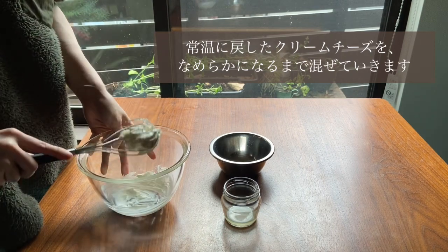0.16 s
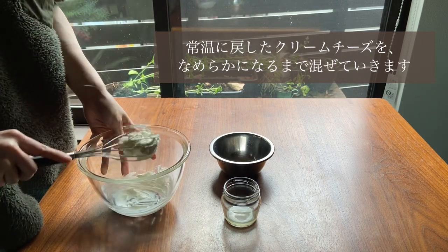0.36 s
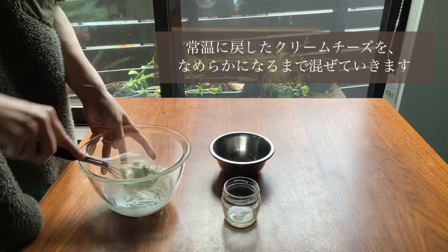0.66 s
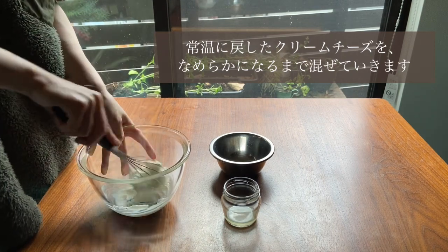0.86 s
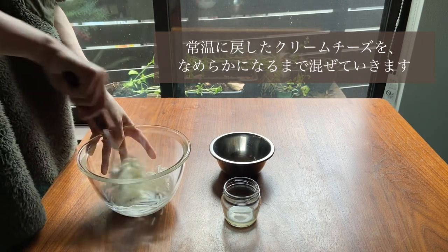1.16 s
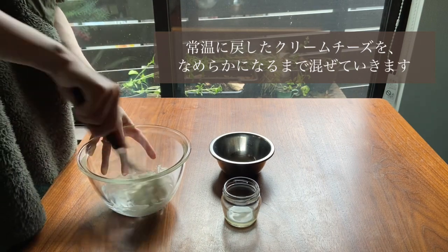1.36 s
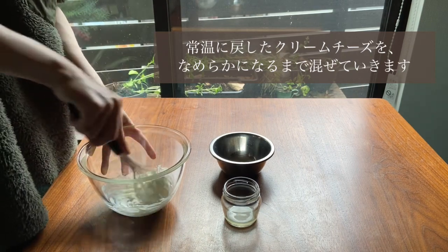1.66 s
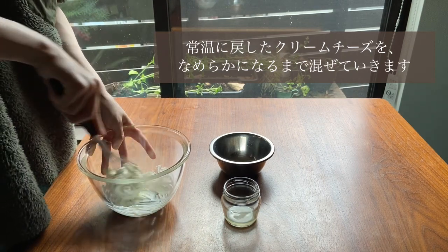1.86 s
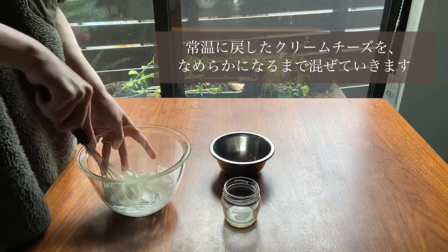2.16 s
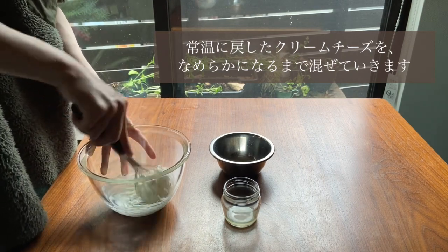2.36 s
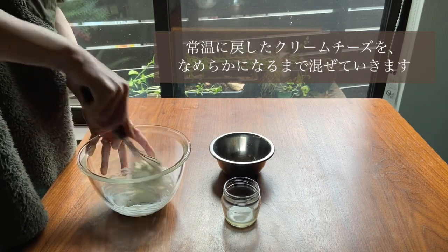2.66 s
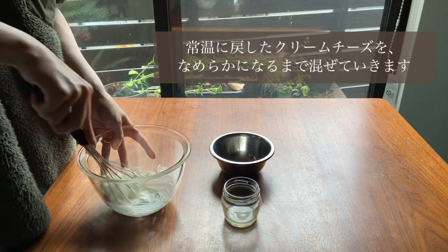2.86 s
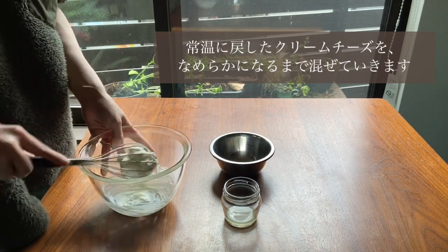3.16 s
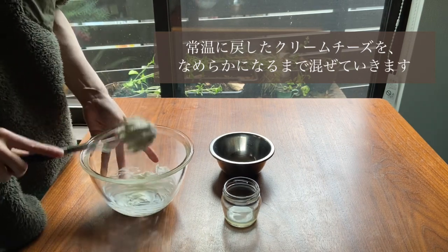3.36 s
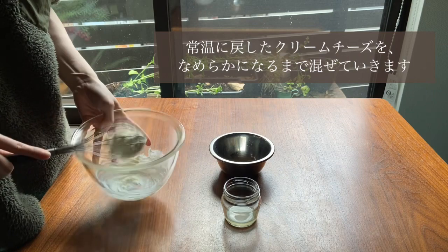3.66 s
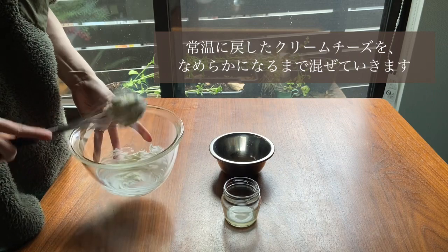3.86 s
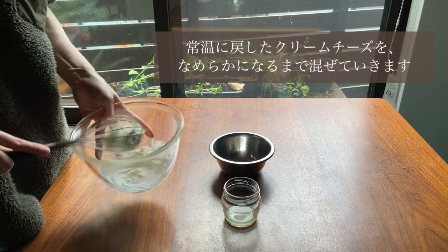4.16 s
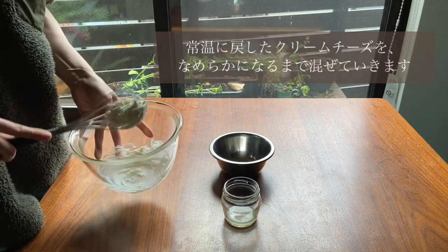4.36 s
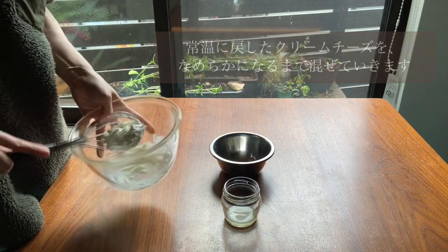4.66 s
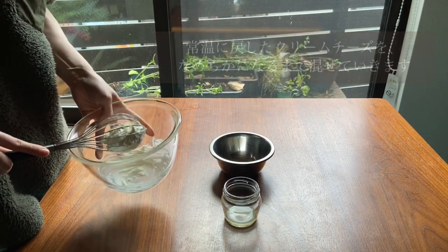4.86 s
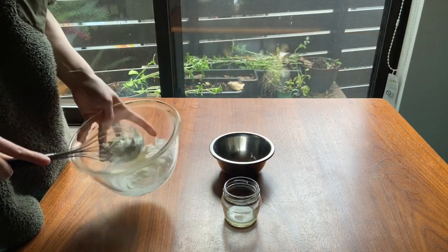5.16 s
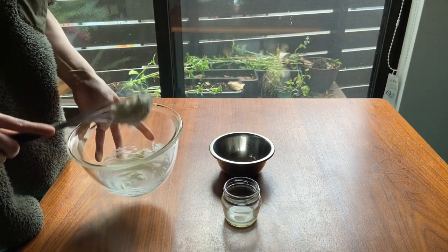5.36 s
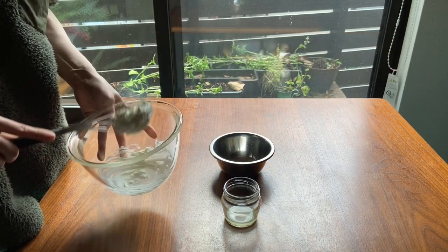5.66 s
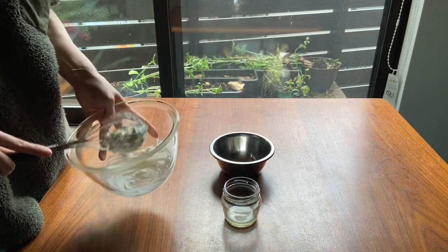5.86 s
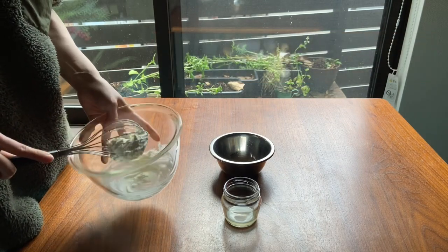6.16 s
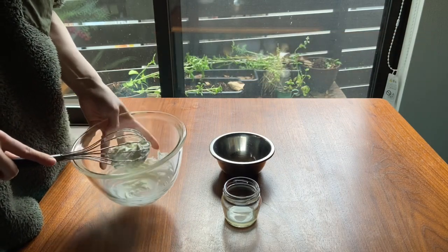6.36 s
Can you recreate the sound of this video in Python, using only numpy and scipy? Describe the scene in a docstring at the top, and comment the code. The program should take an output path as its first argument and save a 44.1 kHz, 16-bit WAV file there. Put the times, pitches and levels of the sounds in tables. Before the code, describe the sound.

In a quiet small kitchen, a wire whisk taps a standing glass bowl three times, each clink backed by a woody table thud. Quick soft stirring strokes follow, with sticky cheese pops and muffled wire chinks. The grip shifts, the bowl is lifted, and the whisk knocks its rim in bright, bouncing clinks while a low wavering hum grows and stops. Close stereo microphones, short room echo.

```python
"""A wire whisk clinks on a glass bowl of soft cheese in a small kitchen: ringing tones plus a noisy clash.
It taps the standing bowl three times, stirs, then knocks the rim of the lifted bowl, often bouncing.
Stirring is made of random tiny slips, the cheese's pops of short noise bursts, the table of thuds and knocks.
A low hum, a wavering tone with a dull rush, swells and stops; quiet air noise lies below.
A close pair of microphones hears it all."""
import sys
import numpy as np
from scipy import signal
from scipy.fft import rfft, irfft
from scipy.io import wavfile

SR = 44100
rng = np.random.default_rng(int(sys.argv[2]) if len(sys.argv) > 2 else 0)


def wrap_up_sound(samples):
    """Save the sound to the file named by the first command line argument, as 16-bit audio."""
    columns = np.atleast_2d(samples).T
    # keep every value between -1 and 1, then stretch to whole-number steps
    tamed = np.clip(columns, -1, 1)
    steps = np.round(tamed * 32767).astype(np.int16)
    wavfile.write(sys.argv[1], SR, steps)


N = 287532  # length in samples
T = np.arange(N) / SR  # time in the scene, s
AGE = T[:int(.42 * SR)]  # time since a blow, s


def undb(db):
    """Turn decibels into a plain multiplier."""
    return 10 ** (np.asarray(db) / 20)


def unit(x):
    """Scale to an average (rms) strength of 1."""
    return x / np.sqrt(np.mean(x ** 2) + 1e-24)


def colour(x, spectrum):
    """Filter by (Hz, dB) points joined by lines on a log-frequency axis."""
    hz, db = np.transpose(spectrum)
    f = np.maximum(np.fft.rfftfreq(x.shape[-1], 1 / SR), 1)
    gain = undb(np.interp(np.log(f), np.log(hz), db))
    return irfft(rfft(x) * gain, x.shape[-1])


def noise(spectrum, size=N):
    """Coloured noise with an rms of 1."""
    return unit(colour(rng.standard_normal(size), spectrum))


def fade(t60, rise):
    """Loudness shape of a blow: quick rise, then a decay of 60 dB in t60 seconds."""
    return (1 - np.exp(-(AGE / rise) ** 2)) * np.exp(-np.log(1000) * AGE / t60)


def swell(start, length, attack, t60):
    """Loudness shape of a movement: it rises, holds, then dies away by 60 dB in t60 seconds."""
    rise = np.clip((T - start) / attack, 0, 1)
    return rise * np.exp(-np.log(1000) * np.maximum(T - start - length, 0) / t60)


def walk(rate):
    """Slow random wandering: rate random points a second, joined by lines."""
    knots = rng.standard_normal(int(N / SR * rate) + 2)
    return np.interp(T * rate, np.arange(len(knots)), knots)


def add(track, s, sound):
    """Mix a sound in at time s."""
    i = max(int(s * SR), 0)
    track[i:i + len(sound)] += sound[:max(N - i, 0)]


def ring(modes, rise, scatter_db, hold=1, detune=0):
    """A struck object sings several fading tones, shared out a little differently each time.

    A hold under 1 damps them, as a touch would."""
    out = np.zeros(len(AGE))
    for hz, db, t60 in modes:
        level, turns, shift = rng.standard_normal(3)
        tone = np.sin(2 * np.pi * (hz * (1 + detune * shift) * AGE + turns))
        out += undb(db + scatter_db * level) * fade(t60 * hold, rise) * tone
    return out


def jangle(modes, rise, hold, count=3):
    """Several wire loops, no two quite alike, beat against each other."""
    loops = sum(ring(modes, rise, scatter_db=1, hold=hold, detune=.007) for _ in range(count))
    return loops / np.sqrt(count)


def crackle(rate, spread):
    """Tiny slips at random moments, about rate a second, most weak and a few strong."""
    sizes = undb(spread * np.minimum(rng.exponential(size=N), 5))
    return unit((rng.random(N) < rate / SR) * sizes * rng.standard_normal(N))


def kitchen(x, t60, wet_db, side_db):
    """Direct sound and a short room echo, whose left and right differ most in the middle range."""
    tail = rng.standard_normal((2, len(AGE))) * fade(t60, 0.0066)
    tail /= np.sqrt(np.sum(tail ** 2, axis=1, keepdims=True))
    mid, side = (signal.fftconvolve(x, h)[:N] for h in tail)
    side = colour(side, [(50, -3.5), (300, 5.5), (1100, 1.5), (2300, -10.5), (4500, -1.5), (9000, -20)])
    return x + undb(wet_db) * mid + undb(side_db) * side * np.array([[1], [-1]])


# tone colour of the quiet air: (frequency [Hz], relative level [dB])
AIR_COLOUR = [(15, -51), (25, -17.5), (50, -1.5), (87, 4.5), (236, -11), (427, -4.5), (531, -8.5),
              (1740, -21), (6920, -23.5), (8830, -46), (11900, -32), (16000, -40.5)]


def quiet_air():
    """Soft steady noise, much alike left and right in the bass."""
    difference = colour(noise(AIR_COLOUR), [(60, -14.5), (1000, -2.0)])
    return undb(-79) * (noise(AIR_COLOUR) + difference * np.array([[1], [-1]]))


# tone colour of the dull rush with the hum: (frequency [Hz], relative level [dB])
RUSH_COLOUR = [(30, -19), (65, 9.5), (130, 10), (250, 4), (400, -4), (800, -10), (1500, -20), (3000, -33),
               (8000, -42.5)]
HUM_START_S, HUM_LENGTH_S, HUM_ATTACK_S = 2.9, 2.2, 0.17
HUM_HZ, HUM_RISE_HZ_PER_S, HUM_LIFT_HZ, HUM_LIFT_S = 123.4, 1.3, 16, 0.07


def hum():
    """A wavering low tone and its octave swell in a dull rush, lift in pitch and stop."""
    running = np.clip(T - HUM_START_S, 0, HUM_LENGTH_S)
    lift = HUM_LIFT_HZ * np.exp((running - HUM_LENGTH_S) / HUM_LIFT_S)
    hz = HUM_HZ + HUM_RISE_HZ_PER_S * running + lift
    phase = 2 * np.pi * np.cumsum(hz * (1 + .014 * walk(9))) / SR
    waver = undb(2.2 * walk(14))
    tone = unit(np.sin(phase) + undb(-17) * np.sin(2 * phase)) * waver
    tone = tone * swell(HUM_START_S, HUM_LENGTH_S, HUM_ATTACK_S, t60=.4)
    rush = undb(-6) * noise(RUSH_COLOUR) * swell(HUM_START_S, HUM_LENGTH_S, HUM_ATTACK_S, t60=.6)
    return undb(-67 + 4.5 * running) * (tone + rush)  # grows 4.5 dB a second


# taps on the standing bowl, also played by taps(): (time [s], strength [dB], time of rocking back [s])
STANDING_TAPS = [(0.023, -39.5, 0.078), (0.26, -40.5, 0.31), (0.479, -40, 0.527)]
# ringing tones of the table top: (frequency [Hz], relative level [dB], time to fade 60 dB [s])
TABLE_TONES = [(135, -8, 0.2), (166.6, -0.5, 0.16), (194.4, -3, 0.11), (278.3, -22, 0.14)]
# tone colour of a knock on wood: (frequency [Hz], relative level [dB])
KNOCK_COLOUR = [(100, -10), (220, 7), (290, 12.5), (360, -12), (420, 8.5), (560, -4.5), (800, 2.5),
                (1050, -8), (1280, -11), (1700, -26.5), (3000, -31), (6000, -68.5), (14000, -39.5)]
# tone colour of a deep boom: (frequency [Hz], relative level [dB])
BOOM_COLOUR = [(25, -33), (42, -11), (58, 9), (95, 3.5), (140, -1.5), (300, -5), (600, -60.5)]
# the table's (thud [dB], knock [dB]) relative to the tap: as it lands, and as the bowl rocks back
PRESS_DB = (13, 3)
ROCK_DB = (5, 8)


def thumps():
    """The bowl's foot knocks on the wood; the table top thuds, and its frame booms a little later."""
    out = np.zeros(N)
    for tap_s, db, rock_s in STANDING_TAPS:
        for s, (thud_db, knock_db) in ((tap_s, PRESS_DB), (rock_s, ROCK_DB)):
            top = ring(TABLE_TONES, rise=0.0092, scatter_db=0.5)
            knock = noise(KNOCK_COLOUR, size=len(AGE)) * fade(0.15, 0.0004)
            frame = undb(-0.5) * noise(BOOM_COLOUR, size=len(AGE)) * fade(0.34, 0.046)
            add(out, s, undb(db + thud_db) * top + undb(db + knock_db) * (knock + frame))
    return out


# tone colour of wires or skin scraping: (frequency [Hz], relative level [dB])
SCRAPE_COLOUR = [(500, -9.5), (1100, -3.5), (1700, 7.5), (2500, 0), (4200, 3.5), (5200, -0.5), (6300, 3.5),
                 (7400, -1.5), (8400, 2.5), (10500, -13.5), (16000, -29)]
# tone colour of the hollow bowl: (frequency [Hz], relative level [dB])
HOLLOW_COLOUR = [(120, -42), (300, -13), (520, 2.5), (620, -4), (720, 4), (840, -1), (1050, -12.5),
                 (2000, -25.5), (6000, -43)]
# tone colour of the treble fizz: (frequency [Hz], relative level [dB])
FIZZ_COLOUR = [(6000, -51.5), (9000, -12), (11500, 3), (12700, 2.5), (14200, -2.5), (15300, 4),
               (16200, -18)]
# tone colour of a push on the table: (frequency [Hz], relative level [dB])
PUSH_COLOUR = [(35, -3.5), (75, 6.5), (175, 5.5), (240, 2), (310, 2.5), (400, -13), (700, -31)]
# shifts of the grip: (time [s], length [s], swish level [dB], treble fizz level [dB], bump level [dB])
GRIP_SHIFTS = [(2.999, 0.043, -72.5, -68.5, -58), (3.211, 0.014, -67, -77, -63),
               (5.005, .04, -65, -69.5, -71)]


def grips():
    """Skin slides on the handle with a smooth swish and nudges the bowl against the table."""
    swish = noise(SCRAPE_COLOUR) + undb(1) * noise(HOLLOW_COLOUR)
    fizz = noise(FIZZ_COLOUR)
    out = np.zeros(N)
    for s, length, db, fizz_db, bump_db in GRIP_SHIFTS:
        slide = undb(db) * swish + undb(fizz_db) * fizz
        out += swell(s, length, attack=0.026, t60=0.33) * slide
        knock = noise(KNOCK_COLOUR, size=len(AGE)) * fade(0.15, 0.0034)
        push = undb(3.5) * noise(PUSH_COLOUR, size=len(AGE)) * fade(0.4, 0.013)
        add(out, s, undb(bump_db) * (knock + push))
    return out


# ringing tones of the whisk's loops: (frequency [Hz], relative level [dB], undamped time to fade 60 dB [s])
WHISK_TONES = [(1667, -21.5, 0.061), (4100, -13.5, 0.45), (4252, -1, 0.19), (6523, -1, 0.021),
               (8270, -3, .13), (8660, 5, 0.057), (10850, -3, 0.14), (11240, -3.5, 0.081),
               (12005, -4.5, 0.13), (13130, -6, 0.15), (13300, -5.5, .08), (14400, -7.5, .07),
               (14900, 1.5, 0.072), (15550, -9, 0.044)]
# wires touching the wall through the cheese: (time [s], level [dB])
WALL_BRUSHES = [(1.0715, -53), (1.1348, -50.5), (1.264, -58.5), (1.4616, -57), (1.4835, -58), (2.1894, -82),
                (2.5561, -49), (2.585, -53), (2.6708, -58), (2.7516, -61), (2.794, -57)]


def brushes():
    """A coated wire catches the wall: damped loops and a burst of noise make a muffled chink."""
    out = np.zeros(N)
    for s, db in WALL_BRUSHES:
        loops = undb(-3) * jangle(WHISK_TONES, rise=0.00033, hold=0.55)
        wires = undb(-3.5) * noise(SCRAPE_COLOUR, size=len(AGE)) * fade(0.045, 0.00029)
        add(out, s, undb(db) * (loops + wires))
    return out


# tone colour of a snapping pocket before its tilt: (frequency [Hz], relative level [dB])
SNAP_COLOUR = [(700, -45), (2000, 3.5), (6000, 2.5), (12000, -4.5), (16000, -15)]
# sticky pops of the cheese: (time [s], level [dB], tilt towards the treble [dB per octave])
CHEESE_POPS = [(0.9147, -70, 18), (0.9418, -57, 6), (1.2219, -36, 2), (1.2513, -55, 8), (1.5422, -48.5, 2),
               (1.6114, -48, 2), (1.877, -36.5, 2), (1.9031, -34, -3), (1.9072, -38, -2.5),
               (1.9926, -50.5, -10), (2.3404, -53.5, 3), (2.586, -42, -3), (2.6442, -42, -4)]


def pops():
    """Air pockets in the cheese snap open, a very short burst, and echo briefly inside the bowl."""
    out = np.zeros(N)
    for s, db, tilt in CHEESE_POPS:
        tone = [(hz, db + snap_db + tilt * np.log2(hz / 5000)) for hz, snap_db in SNAP_COLOUR]
        snap = undb(18.5) * fade(0.0016, 0.00031)
        echo = undb(-14.5) * fade(0.11, 0.0021)
        add(out, s, colour(rng.standard_normal(len(AGE)), tone) * (snap + echo))
    return out


# strokes: (time [s], length [s], scrape level [dB], push on table level [dB], hollow rub level [dB])
STIR_STROKES = [(0.918, 0.035, -91, -66, -86), (1.056, 0.092, -68.5, -59, -64),
                (1.253, 0.13, -66, -69.5, -77), (1.434, 0.065, -62.5, -55.5, -59),
                (1.611, 0.1, -77, -68, -79.5), (1.769, 0.14, -68, -64.5, -72.5),
                (1.944, 0.19, -81.5, -79.5, -87), (2.16, 0.045, -66.5, -59, -74.5),
                (2.295, 0.067, -68, -65.5, -78.5), (2.394, 0.16, -67, -68, -72),
                (2.541, 0.082, -68, -56, -68.5), (2.658, 0.15, -66.5, -68.5, -72.5)]
STROKE_ATTACK_S, CLING_DB = 0.034, 3  # cling: how much the scrape's colour varies from stroke to stroke


def stirring():
    """Wires slip through the cheese and set damped loops singing; bowl and table rumble under the push."""
    slips = crackle(rate=1600, spread=2.2) * undb(3 * walk(69))
    loops = signal.fftconvolve(slips, jangle(WHISK_TONES, rise=0.00035, hold=0.12))[:N]
    rub = unit(slips) + undb(-9) * unit(loops)
    treble = unit(colour(rub, SCRAPE_COLOUR)) + undb(-7.5) * unit(colour(rub, FIZZ_COLOUR))
    stutter = crackle(rate=500, spread=1.2)
    judder = unit(colour(stutter, HOLLOW_COLOUR)) + undb(-13.5) * unit(colour(stutter, KNOCK_COLOUR))
    rumble = noise(PUSH_COLOUR)
    lumps = undb(2 * walk(30))
    bands_hz = np.geomspace(900, 14000, 36)
    out = np.zeros(N)
    for s, length, scrape_db, push_db, hollow_db in STIR_STROKES:
        # the cheese clings to the wires differently on every stroke
        cling = np.column_stack([bands_hz, CLING_DB * rng.standard_normal(len(bands_hz))])
        scrape = undb(scrape_db) * unit(colour(treble, cling))
        drag = scrape + undb(hollow_db) * judder
        out += drag * lumps * swell(s, length, STROKE_ATTACK_S, t60=0.17)
        out += undb(push_db) * rumble * swell(s, length, STROKE_ATTACK_S, t60=0.44)
    return out


# middles of the seven tone families, low body, body, first ring, second ring, upper rings, jingle,
# top jingle: frequency [Hz]
FAMILY_HZ = [420, 700, 2300, 4250, 7000, 9700, 12500]


def struck(modes, family_db):
    """Make the tones as loud as this blow drives their family."""
    return [(hz, db + np.interp(np.log(hz), np.log(FAMILY_HZ), family_db), t60) for hz, db, t60 in modes]


# ringing tones of the glass: (frequency [Hz], level in its family [dB], undamped time to fade 60 dB [s])
BOWL_TONES = [(402, -2, .19), (613, -6, .12), (668, 0, .12), (720, -7, .08), (866, -5, .18),
              (2299, 2, .125), (2330, -9, .06), (4177, -11, .26), (4268, -10, .24), (6631, -4, .13),
              (9670, 3, .11), (10410, -5, .14), (10828, -1, .14), (11715, -9, .12), (12028, -6, .18),
              (12427, -8, .09), (14205, -7, .12)]
# tone colour of the wires' dense clatter: (frequency [Hz], relative level [dB])
CLATTER_COLOUR = [(150, -11.5), (400, -15), (700, -5), (1250, -12.5), (1800, -6.5), (3200, -8.5),
                  (4300, -7.5), (5500, -7), (7500, -1), (10000, 3), (13000, -1.5), (13700, -7), (15300, 2),
                  (16500, -16)]


def clink(family_db, thud_db, hold):
    """Wires clash on the glass and rattle briefly; glass and loops ring on, the hand takes a soft thud."""
    low_db, body_db, _, _, upper_db, jingle_db, top_db = family_db
    glass = ring(struck(BOWL_TONES, family_db), rise=0.0022, scatter_db=1.5, hold=hold, detune=0.0005)
    loops = undb(8.5) * jangle(struck(WHISK_TONES, family_db), rise=0.00051, hold=0.39)
    brightness = [(700, body_db), (1200, upper_db), (7500, upper_db), (9700, jingle_db), (12500, top_db)]
    wires = colour(noise(CLATTER_COLOUR, size=len(AGE)), brightness)
    clash = undb(12.5) * fade(0.014, 0.00095)
    rattle = undb(-1.0) * fade(0.1, 0.0035)
    bowl_air = undb(low_db - 4.0) * noise(HOLLOW_COLOUR, size=len(AGE)) * fade(0.14, 0.012)
    thud = undb(thud_db) * noise(BOOM_COLOUR, size=len(AGE)) * fade(0.2, 0.0019)
    return glass + loops + wires * (clash + rattle) + bowl_air + thud


# whisk on the rim of the lifted bowl, weak blows being bounces: (time [s], strength [dB],
# spot on the whisk [0 neck to 1 belly], extra first ring [dB], extra second ring [dB])
RIM_TAPS = [(3.4, -38, 0.017, -10, -6.5), (3.65, -33, 0.01, -5, 10), (3.893, -32, 0.067, 0.5, -13.5),
            (3.965, -40, 0.016, 1.5, -2.5), (4.146, -32, 0.022, -1.5, -2.5), (4.21, -41, 0.018, -15, 3.5),
            (4.402, -30.5, 0.11, -3.5, -5), (4.482, -45, .02, -4.5, 1.5), (4.631, -31.5, 0.24, -6, 0),
            (4.684, -38, 0.035, -0.5, 2), (5.122, -30.5, .1, 3, 5.5), (5.202, -37, 0.023, -14.5, 0.5),
            (5.445, -30.5, 0.93, -2, -3), (5.544, -44.5, 0.88, -7, 1.5), (5.774, -33, 1, -3, -5.5),
            (6.074, -31.5, 0.81, 2, -1), (6.192, -44, 0.65, -5.5, 0.5), (6.325, -53.5, 0.82, -9, -1),
            (6.404, -59.5, 0.11, -12, -14), (6.485, -61.5, .2, -10.5, -9)]
# how each contact drives the seven families: level [dB]
NECK_DB = [-26.5, -5.5, 1.5, -8.5, 0, -10.5, 0]
BELLY_DB = [-6.5, 4, 9, -11.5, -2, 1.5, -3]
STANDING_DB = [-5, -2.5, -7.5, -15, -6, -9, 5]
# how much more a firm blow drives each family: extra level [dB per dB of strength above FIRM_DB]
FIRMNESS = [0.24, 0.39, 0.02, 0, 0.02, 0.019, 0.38]
FIRM_DB = -38
NECK_THUD_DB, BELLY_THUD_DB, STANDING_THUD_DB = -18, -38, -4  # thud in the hand, relative to strength


def taps():
    """The standing bowl is damped more; on the lifted one the neck sounds thin, the belly full.

    Firm blows weigh on the glass and fling the wires more than light ones."""
    out = np.zeros(N)
    for s, db, _ in STANDING_TAPS:
        add(out, s, clink(db + np.array(STANDING_DB), db + STANDING_THUD_DB, hold=0.58))
    for s, db, spot, first_db, second_db in RIM_TAPS:
        contact_db = (1 - spot) * np.array(NECK_DB) + spot * np.array(BELLY_DB)
        family_db = db + contact_db + (db - FIRM_DB) * np.array(FIRMNESS)
        family_db[2:4] += first_db, second_db
        thud_db = db + (1 - spot) * NECK_THUD_DB + spot * BELLY_THUD_DB
        add(out, s, clink(family_db, thud_db, hold=0.7))
    return out


def scene():
    """Bowl and table, each with its echo in a small room, over quiet air."""
    bowl_sounds = taps() + brushes() + pops() + stirring() + grips()
    bowl = kitchen(bowl_sounds, t60=0.32, wet_db=-18, side_db=-14.0)
    table = kitchen(thumps() + hum(), t60=0.24, wet_db=-13, side_db=-14.5)
    return bowl + table + quiet_air()


# the two microphone ports: (frequency [Hz], lead of left over right [radians], left minus right [dB])
PORTS = [(0, 0, -1), (400, 0, -2), (900, .5, 0), (1550, .6, 1.5), (2000, .1, 1.3), (3400, .1, 0),
         (4300, -.7, -2), (5200, -.3, -2.5), (6200, -.2, -4.5), (6800, .2, 0), (8400, 2.6, 0),
         (10700, 4.9, 0), (12800, 6.6, 0), (14200, 8.6, 0), (16000, 9.6, 0)]


def record(dry):
    """The ports shift timing and level against each other; the top above 16 kHz is cut."""
    hz, lead, balance_db = np.transpose(PORTS)
    f = np.fft.rfftfreq(2 * N, 1 / SR)
    halves = np.array([[.5], [-.5]])  # each side takes half the difference
    phase = np.interp(f, hz, lead) * halves
    gain = undb(np.interp(f, hz, balance_db) * halves)
    pair = irfft(rfft(dry, 2 * N) * np.exp(1j * phase) * gain)[:, :N]
    return signal.sosfilt(signal.ellip(8, .2, 70, 16000, fs=SR, output="sos"), pair)


dry = scene()
out = record(dry)
wrap_up_sound(out)
```